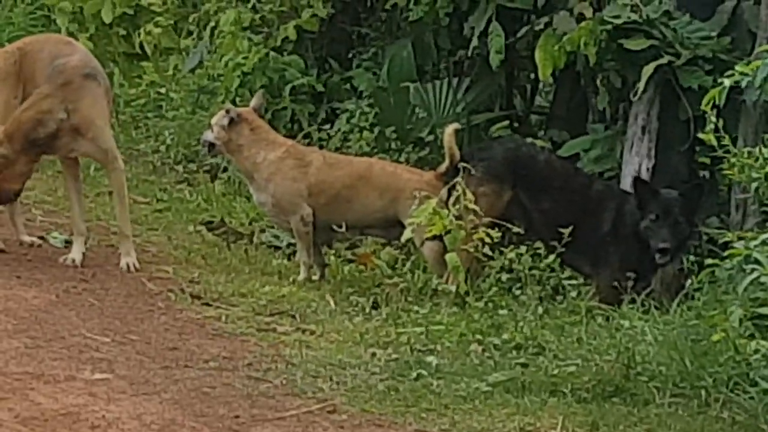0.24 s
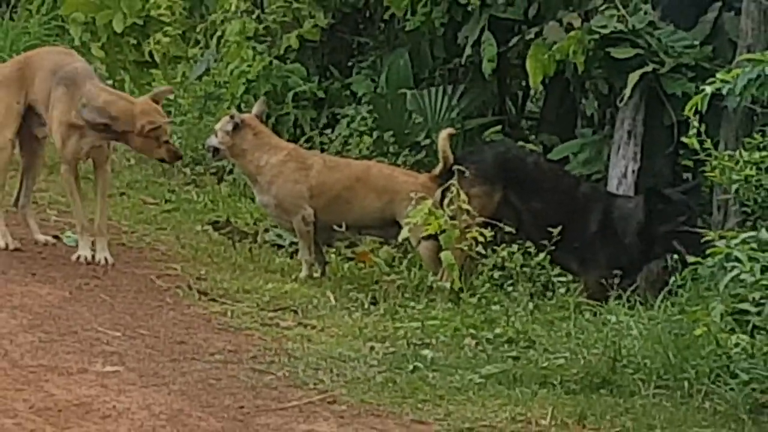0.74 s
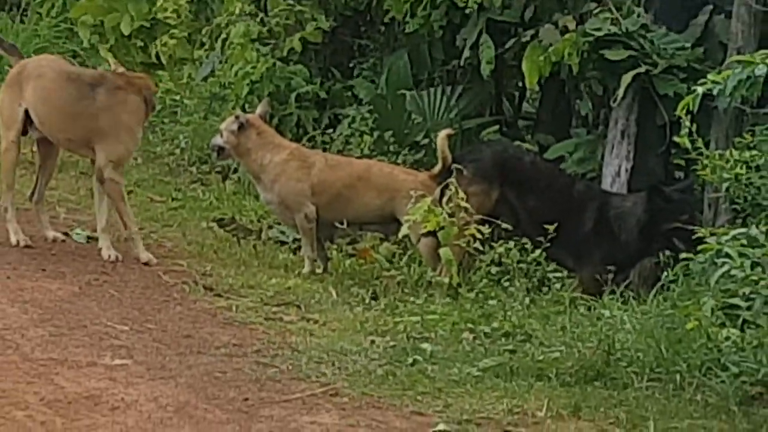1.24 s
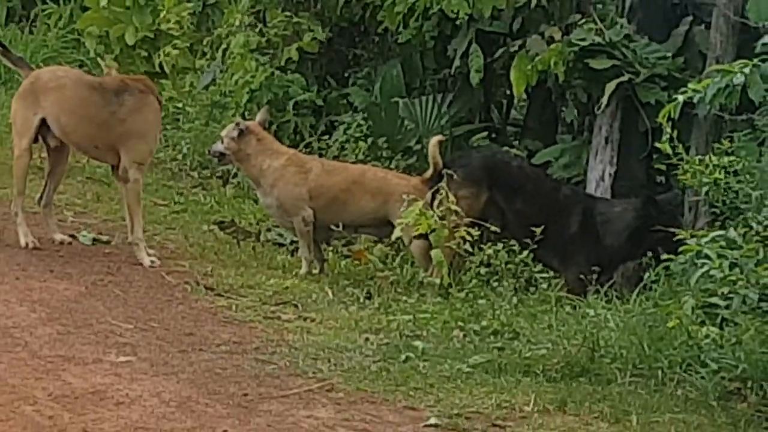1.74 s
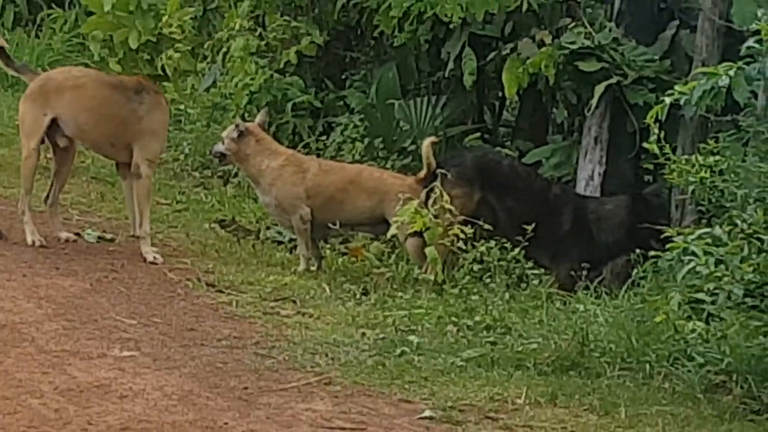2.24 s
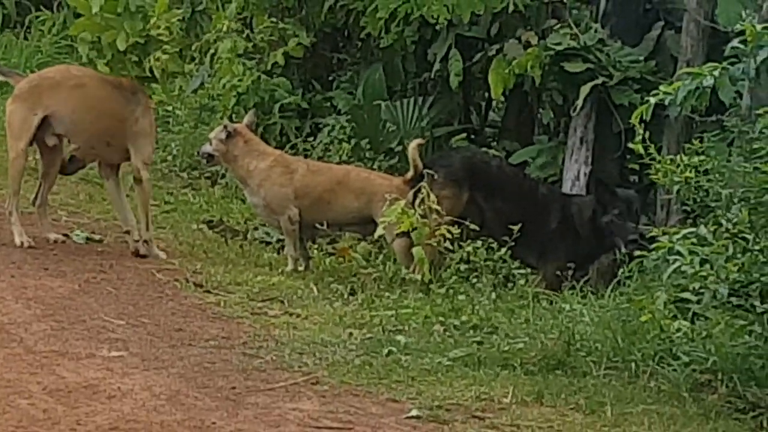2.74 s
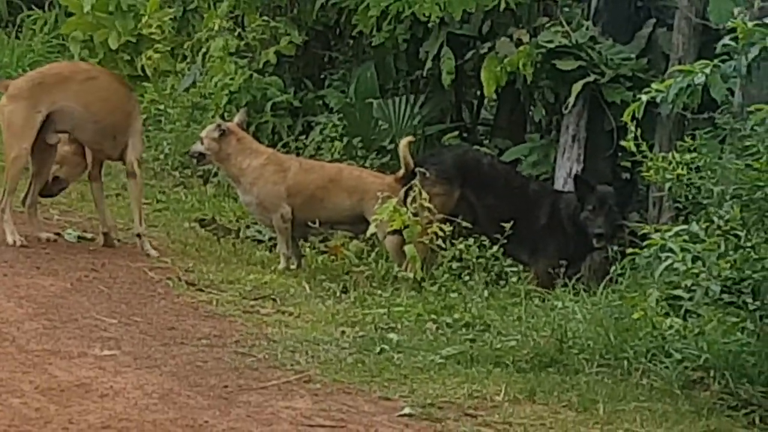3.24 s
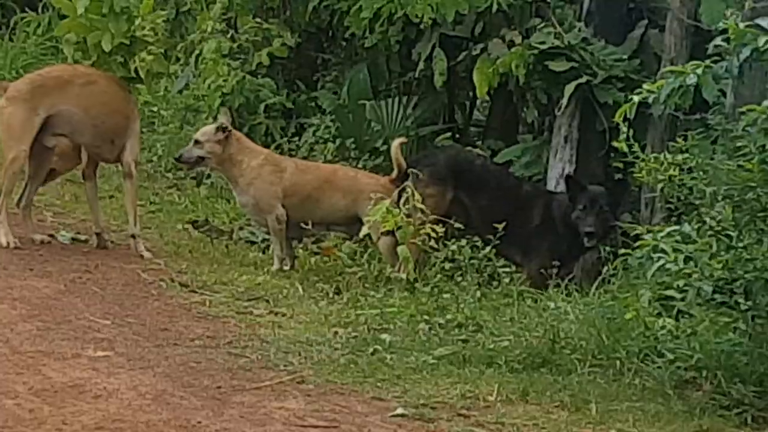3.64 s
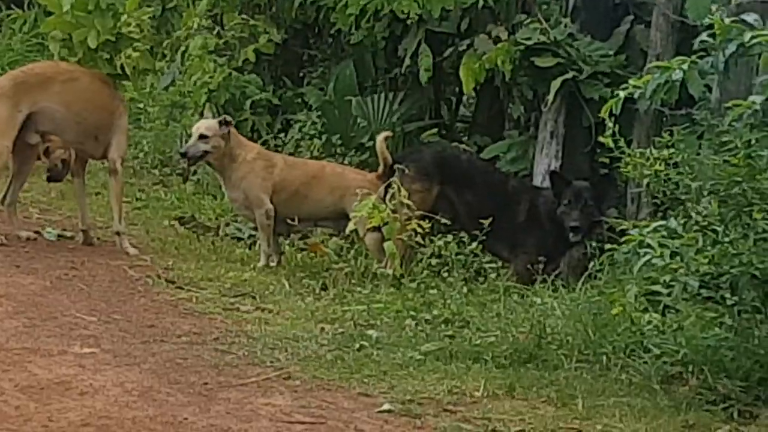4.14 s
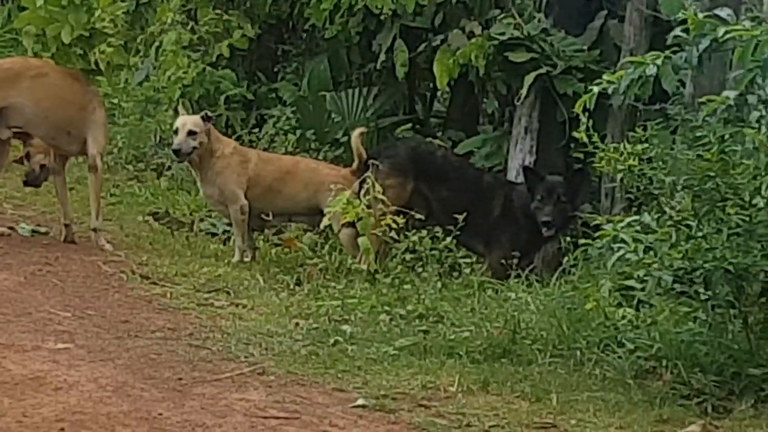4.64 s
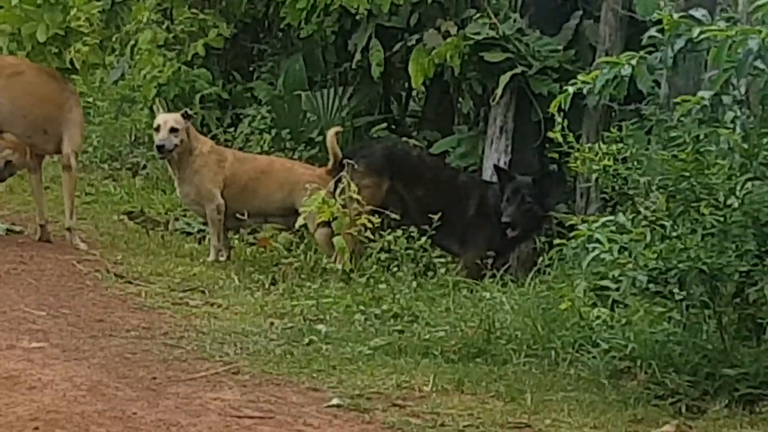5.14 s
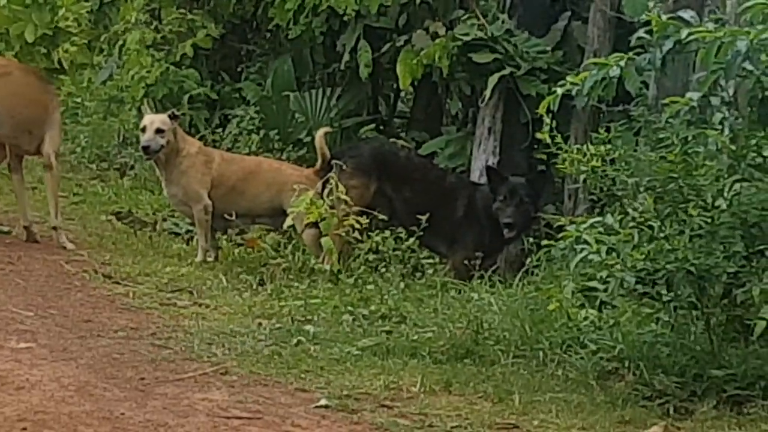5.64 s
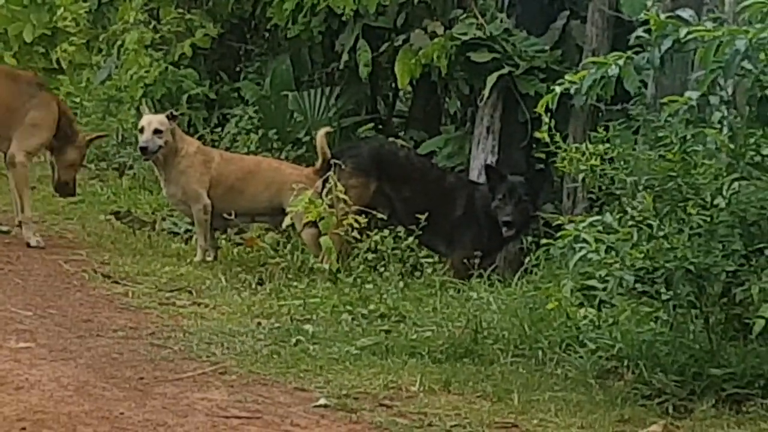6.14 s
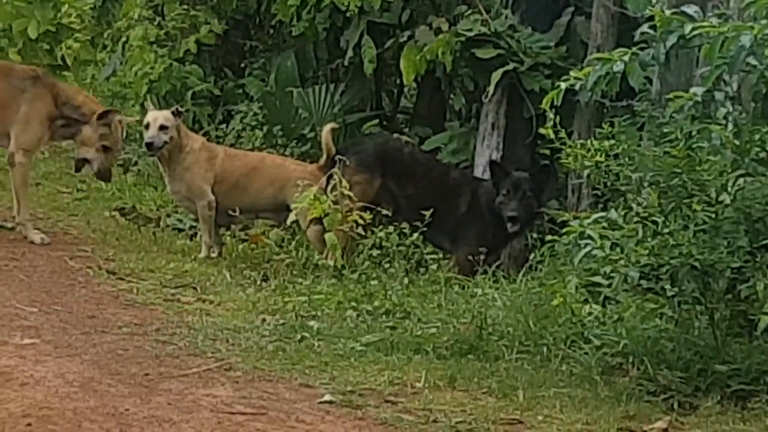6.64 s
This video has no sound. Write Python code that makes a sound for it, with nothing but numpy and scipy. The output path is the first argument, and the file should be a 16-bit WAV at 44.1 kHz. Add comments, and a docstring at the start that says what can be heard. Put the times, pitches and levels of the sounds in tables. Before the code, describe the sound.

A distant motorbike putters, grows much louder and passes close, rasping and throbbing, as one bird repeats a thin, high chip.

```python
"""At first a small one-cylinder engine, likely a motorbike, putters far down a dirt road, each firing
thumping through the muffler. A bird repeats one thin chip all along, over a soft countryside wash.
Near 3 s a breeze rises. At about 3.6 s the bike passes: gas rasps and hisses from the pipe, chain
and tyres clatter and a panel rings. The exhaust booms loudest near 5 s, then throbs as the bike
carries on, and one last gust blows by."""
import sys
import numpy as np
from scipy import signal
from scipy.fft import rfft, irfft
from scipy.io import wavfile
from scipy.ndimage import uniform_filter1d, map_coordinates

SR = 44100
rng = np.random.default_rng(int(sys.argv[2]) if len(sys.argv) > 2 else 0)


def waveform_to_disk(signal):
    """Save audio, clipped to [-1, 1], as 16-bit WAV at the path in sys.argv[1]."""
    frames = np.transpose(np.atleast_2d(signal))
    scaled = np.clip(frames, -1, 1) * 32767
    samples = np.round(scaled).astype(np.int16)
    wavfile.write(sys.argv[1], SR, samples)


N = 303827
T = np.arange(N) / SR
HZ = np.fft.rfftfreq(N, 1 / SR)
CLOSEST_S = 3.6  # when the bike is nearest


# How often the engine fires: t/s, f/Hz
FIRING_RATE = [(0.0, 37.08), (0.6, 36.57), (0.95, 37.04), (1.2, 36.4), (1.5, 36.98), (1.9, 36.24),
               (2.4, 37.16), (2.85, 36.23), (3.15, 36.72), (3.5, 36.11), (4.0, 36.0), (4.5, 36.0),
               (4.9, 36.06), (5.4, 35.89), (5.9, 35.67), (6.3, 35.48), (6.89, 35.5)]
def firings(first_firing_cycles=.27, jitter_cycles=.004, uneven_db=.5):
    """Fuel fires once a cycle, a bit unevenly. Gives a click per firing and the time since the last."""
    rate, = curves(FIRING_RATE)
    cycles = np.cumsum(rate) / SR - first_firing_cycles + jitter_cycles * drift(12)
    count = np.floor(cycles)
    pulses = np.diff(count, prepend=count[0]) * gain_of(uneven_db * drift(12))
    return pulses, cycles % 1 / rate


# The muffler's tone when far, alongside and past: f/multiples of firing_hz, relative level/dB
TONE_FAR = [(1, -29.5), (2, -17.5), (3, -14), (4, -4), (5, 2), (6, 0.5), (7, -26), (8, -8.5), (9, -1),
            (10, 7), (11, 2), (12, -25), (13, -31), (14, -23)]
TONE_ALONGSIDE = [(1, -35.5), (2, -23.5), (3, -18.5), (4, -11.5), (5, -0.5), (6, -2.5), (7, -12), (8, -6),
                  (9, -4.5), (10, -7.5), (11, -13.5), (12, -23.5), (13, -26.5), (14, -28.5)]
TONE_PAST = [(1, -39.5), (2, -27), (3, -17), (4, -7.5), (5, 4.5), (6, -3), (7, -13), (8, -10), (9, -8.5),
             (10, -14), (11, -24.5), (12, -40), (13, -35.5), (14, -34)]
# The pipe turns from far to alongside, then to past: start t/s, length/s
PIPE_TURNS = [(2.15, .65), (3.72, .45)]
def muffler(pulses, firing_hz=36.06):
    """Each firing rings the muffler, whose tone changes as we hear the pipe from a new side."""
    view = sum(ramp(start, length) for start, length in PIPE_TURNS)  # 0 far, 1 alongside, 2 past
    sound = np.zeros(N)
    for k, tone in enumerate([TONE_FAR, TONE_ALONGSIDE, TONE_PAST]):
        overtones = [(multiple * firing_hz, db) for multiple, db in tone]
        colour = [(4.2, -61)] + overtones + [(620, -46), (1200, -58), (3000, -88.5)]
        share = np.clip(1 - abs(view - k), 0, 1)
        sound -= share * ring(pulses, colour)
    return sound


# Loudness of the exhaust's three low ranges, before trims: t/s, level/dB of thud, of boom, of bark
EXHAUST_LEVELS = [(0.0, -62, -40, -48), (0.64, -50, -49.5, -45.5), (0.78, -59.5, -43.0, -50.5),
                  (1.14, -52.0, -48.5, -41), (1.45, -46, -41.5, -41.5), (1.72, -46, -48.5, -41),
                  (1.91, -62, -39.5, -43.5), (2.26, -47.5, -42.5, -45), (2.38, -50, -37.0, -35),
                  (2.6, -50, -37.5, -37.5), (2.79, -37.5, -28.5, -31.5), (3.12, -34.5, -27, -41.5),
                  (3.241, -42.5, -29, -32), (3.68, -39, -23.5, -25.5), (3.8, -34, -36, -36.5),
                  (4.069, -31.5, -24, -30.5), (5.15, -29, -18, -30), (5.529, -30, -22, -31),
                  (5.96, -32.5, -22, -29.0), (6.08, -36, -28.5, -37.5), (6.64, -41.0, -26.5, -43),
                  (6.89, -30.5, -40, -50)]
# Throb of thud, boom and bark as sound and echo beat: depth/dB, f/Hz, crest t/s
THROBS = [(3.6, 1.15, 5.45), (2.7, 4.45, 5.92), (2.0, 2.8, 5.75)]
# Tree echo against the direct sound, strong when the bike is far or hidden: t/s, level/dB
ECHO_LEVEL = [(2.2, 0), (2.42, -8), (2.95, -13), (3.16, -3), (3.35, -15), (3.72, -15), (3.82, -1),
              (4.2, -12), (5.9, -11), (6.2, -2)]
def exhaust(pulses, trims_db=(-1, -.44, -.32), flutter_db=1.1):
    """The muffler and its echoes: a thud, a boom near 180 Hz, a bark an octave up, faint overtones."""
    direct = muffler(pulses)
    echo = trunk_echoes(direct)
    echo = echo + gain_of(-9) * scatter(echo, fade_s=.51, alike=.53)
    echo_db, = curves(ECHO_LEVEL)
    spectrum = rfft(fading(direct + gain_of(echo_db) * echo))
    # split into thud, boom, bark and overtones, so each can swell on its own
    below_boom, below_bark, below_top = (1 / (1 + (HZ / hz) ** steep)
                                         for hz, steep in [(160, 20), (262, 20), (455, 60)])
    bands = [below_boom, below_bark - below_boom, below_top - below_bark, 1 - below_top]
    leaving = ramp(CLOSEST_S, 2.2)
    gains = []
    for level_db, trim_db, (depth_db, hz, crest_s) in zip(curves(EXHAUST_LEVELS), trims_db, THROBS):
        throb_db = depth_db * leaving * np.cos(2 * np.pi * hz * (T - crest_s))
        gains.append(gain_of(level_db + trim_db + throb_db))
    gains.append(passing(-57, at_s=3.9, nearing_s=1.8, leaving_s=1) + swell(-55, at_s=3.58, width_s=.35))
    return sum(gain * gain_of(flutter_db * drift(13)) * steady(irfft(spectrum * band, N))
               for gain, band in zip(gains, bands))


# The pipe's hollow chuff and the rasping gas: f/Hz, relative level/dB
CHUFF_COLOUR = [(250, -44.5), (420, -12), (500, -0.5), (600, -8), (720, -8), (850, -22.5), (1300, -47),
                (3000, -84.5)]
RASP_COLOUR = [(450, -45), (700, -19.5), (860, 2), (980, -4), (1110, -1.5), (1230, -3.5), (1500, -3),
               (1750, -17), (2200, -29.5), (4500, -75.5)]
def gas_puffs(pulses, age, knock_db=-2, crack_db=-5):
    """Each firing knocks in the pipe and puffs out swirling gas: crisp up close, smeared far away."""
    near = bell(CLOSEST_S, .54)
    crisp = puff(age, rise_s=.0014, decay_s=.008, rest=.24)
    smeared = puff(age, rise_s=.00073, decay_s=.0051, rest=.56)
    flow = near * crisp + (1 - near) * smeared
    # from far away the knock is heard by its echoes
    knock = ring(pulses, CHUFF_COLOUR)
    far_knock = steady(scatter(trunk_echoes(knock), fade_s=.21, alike=.57))
    knock = near * knock + (1 - near) * far_knock
    chuff = noise(CHUFF_COLOUR, alike=.2) * flow + gain_of(knock_db) * knock
    crack = near * ring(pulses, RASP_COLOUR)  # the steep front of each pulse
    rasp = noise(RASP_COLOUR, alike=.66) * flow + gain_of(crack_db) * crack
    chuff_gain = (passing(-55.5, at_s=4.8, nearing_s=4.4, leaving_s=1.1)
                  + swell(-53.5, at_s=3.6, width_s=.25) + swell(-52.5, at_s=4.28, width_s=.3))
    rasp_gain = (passing(-56.5, at_s=4, nearing_s=1.1, leaving_s=2)
                 + swell(-50, at_s=3.613, width_s=.23) + swell(-55, at_s=5.234, width_s=.22))
    return chuff_gain * chuff + rasp_gain * rasp


# Whistling notes of the pipe's mouth: f/Hz, width/Hz, relative level/dB
PIPE_WHISTLES = [(2800, 990, -2.5), (3900, 380, -4.5), (5140, 340, -3), (5450, 320, -7.5), (6260, 330, -3),
                 (6430, 620, -9), (7580, 450, -5), (8600, 900, -22), (12500, 2500, -16)]
def jet(age, start_s=3.16, attack_s=.22, sag_db_per_s=5, bright_db_per_octave=4):
    """Each firing spits a beam of hiss, heard only while the pipe's mouth points our way."""
    spit = rng.standard_normal((2, N)) * puff(age, rise_s=.003, decay_s=.0035, rest=.075)
    head_on = bell(3.49, .1)  # brightest when it points straight at us
    hiss = np.zeros((2, N))
    for hz, width, db in PIPE_WHISTLES:
        whistle = signal.lfilter(*signal.iirpeak(hz, hz / width, SR), spit)
        whistle = signal.lfilter(*signal.iirpeak(hz, hz / width / 2, SR), whistle)
        bright_db = bright_db_per_octave * np.log2(hz / 4000) * head_on
        hiss += gain_of(db + 3 * drift(18) + bright_db) * evened(whistle)
    level_db = -59 - sag_db_per_s * (T - start_s - attack_s)
    gain = gain_of(level_db) * hold(start_s, attack_s, end_s=3.95, release_s=.13)
    return gain * evened(hiss) * gain_of([[1], [-1]])  # a little to the left


# Chain and tyres: f/Hz, relative level/dB
CLATTER_COLOUR = [(500, -24), (900, -9.5), (1400, 0.5), (1900, -0.5), (2500, -1.5), (3200, -6.5),
                  (3800, -8), (4400, -9.5), (5000, -12.5), (6500, -25.5), (9000, -36.5)]
def clatter(age):
    """Chain and tyres rattle fairly steadily, a little harder at each firing."""
    gain = passing(-60, at_s=4.27, nearing_s=1.9, leaving_s=1.6) + swell(-64.5, at_s=5.38, width_s=.33)
    return gain * noise(CLATTER_COLOUR, alike=.19) * puff(age, rise_s=.001, decay_s=.006, rest=1)


# The panel's one narrow note: f/Hz, relative level/dB
PANEL_COLOUR = [(1800, -60), (2300, -22), (2410, -5), (2460, 0), (2510, -6), (2620, -22), (3300, -60)]
def panel(far_db=-82, held_db=-71.5):
    """A fitful ring, likely a shaken metal panel, loudest as the bike draws level."""
    held = gain_of(held_db + 2.3 * drift(10)) * hold(start_s=3.14, attack_s=.13, end_s=6, release_s=.47)
    gain = gain_of(far_db) + held + swell(-63.5, at_s=3.44, width_s=.2)
    return gain * noise(PANEL_COLOUR, alike=.13)


# How much later the bike's sound reaches the left side: t/s, delay/samples
LEFT_DELAY = [(0, 18), (2.2, 18), (2.8, -4), (3.5, -6), (4.8, -6), (5.8, -4), (6.3, -4), (6.89, 7)]
def from_road(x):
    """Sound reaches one side a little before the other, which tells us where the bike is."""
    delay, = curves(LEFT_DELAY)
    return np.array([map_coordinates(side, [np.arange(N) - sign * delay / 2], order=3, mode="nearest")
                     for side, sign in zip(x, (1, -1))])


# Big trees that throw the sound back: along the road/m, off the road/m, relative level/dB
TRUNKS = [(14.15, 3, 0), (7, -4, -5), (2, 6, -6), (-9, 4, -7)]
def trunk_echoes(x, bike_m_per_s=2.35, listener_off_m=2, sound_m_per_s=343):
    """Echoes off the trunks; their delay slides as the bike rolls, so the overtones beat."""
    bike_m = bike_m_per_s * (T - CLOSEST_S)
    direct_m = np.hypot(bike_m, listener_off_m)
    thrown = irfft(rfft(x) * np.minimum(HZ, 400), N)  # trunks return short waves best
    echoes = np.zeros(N)
    for along, off, db in TRUNKS:
        detour_m = np.hypot(bike_m - along, off) + np.hypot(along, off - listener_off_m) - direct_m
        echoes += gain_of(db) * np.interp(abs(T - detour_m / sound_m_per_s), T, thrown)
    return evened(echoes) * x.std()


def scatter(x, fade_s, alike):
    """Trunks and leaves scatter many tiny echoes, which die away by 60 dB in fade_s."""
    t = np.arange(SR // 2) / SR
    taps = rng.standard_normal((3, len(t))) * (rng.random((3, len(t))) < .05)
    taps *= (t > .006) * gain_of(-60 * t / fade_s)
    tail = np.sqrt(alike) * taps[0] + np.sqrt(1 - alike) * taps[1:]
    return signal.fftconvolve(x[None], tail / np.linalg.norm(tail[0]), axes=1)[:, :N]


def fading(x, depth_db=3.2, step_hz=48):
    """Paths through the bushes keep shifting, so each upper overtone fades in and out on its own."""
    spectrum = rfft(x)
    for hz in np.arange(230, 500, step_hz):
        band = irfft(spectrum * np.clip(1 - abs(HZ - hz) / step_hz, 0, 1), N)
        x = x + band * (gain_of(depth_db * drift(3)) - 1)
    return x


# The bird's chips: t/s, relative level/dB, top of the arch f/Hz
CHIPS = [(-.03, -50, 7400), (0.672, -54, 7130), (1.482, -53.5, 7100), (2.253, -54.5, 7040),
         (3.055, -51.5, 6980), (3.885, -53, 7030), (4.574, -53, 6900), (5.319, -52.5, 7010),
         (6.05, -55.5, 6950)]
def bird(length_s=.04, direct_db=-5, echo_db=-3):
    """Each chip arches up and down in pitch with a fast rasp; the leaves smear it."""
    song = np.zeros(N)
    rasp_hz = 135 * drift(350)
    for start_s, db, top_hz in CHIPS:
        progress = np.clip((T - start_s) / length_s, 0, 1)
        hz = top_hz - 640 * (2 * progress - .9) ** 2 + rasp_hz
        gain = gain_of(db) * np.sin(np.pi * np.sqrt(progress))
        song += gain * np.sin(2 * np.pi * np.cumsum(hz) / SR)
    return gain_of(direct_db) * song + gain_of(echo_db) * scatter(song, fade_s=.34, alike=.1)


# Rustles in the grass: t/s, level/dB, decay/s
RUSTLES = [(1.363, -58, 0.026), (5.217, -64, .006)]
def grass():
    """Dry grass is brushed for a moment."""
    gain = sum(gain_of(db) * (T > s) * np.exp(-abs(T - s) / decay) for s, db, decay in RUSTLES)
    return gain * noise([(500, -19), (2000, 3), (7000, -3), (15000, -12)], alike=.4)


# Low flutter of moving air: f/Hz, relative level/dB
BREEZE_COLOUR = [(12, -16.5), (25, -11.5), (40, -9), (52, 0), (70, -5), (100, -2.5), (300, -39.5),
                 (600, -68)]
def breeze(calm_db=-68, breeze_db=-53, lumpy_db=2):
    """Air softly buffets the microphone: calm, then a lumpy breeze with one late gust."""
    gust = swell(-50, at_s=6.7, width_s=.097)
    gain = gain_of(calm_db) + gain_of(breeze_db) * ramp(2.65, .37) + gust
    return gain * gain_of(lumpy_db * drift(4.8)) * noise(BREEZE_COLOUR, alike=.6)


# The countryside's soft wash: f/Hz, relative level/dB
WASH_COLOUR = [(30, -33.5), (60, -13.5), (110, -8), (190, -12), (360, -3.5), (455, -15), (815, -19.5),
               (1500, -26), (2120, -27), (3600, -36), (6000, -40), (8200, -43.5), (9500, -48.5),
               (15700, -53)]
# How alike the wash is on the left and right: f/Hz, relative likeness
WASH_LIKENESS = [(60, 0.92), (150, 1), (380, 0.77), (950, 0.03), (2380, -0.14), (5980, -0.16),
                 (15000, 0.13)]
def countryside(leaves_db=-59.5, swell_db=2):
    """Leaves and faraway sounds blend and gently swell; the leaves' range sets the loudness."""
    air = noise(WASH_COLOUR, alike=1.2 * at_pitches(WASH_LIKENESS, HZ))
    leaves = signal.sosfilt(signal.butter(4, [700, 6000], "band", fs=SR, output="sos"), air.mean(0))
    return gain_of(leaves_db + swell_db * drift(3.2)) * air / leaves.std()


def gain_of(db):
    """Turns decibels into a number to multiply by."""
    return 10 ** (np.asarray(db) / 20)


def evened(x):
    """Scales a signal to an average (rms) size of 1."""
    return x / np.sqrt(np.mean(x ** 2) + 1e-20)


def steady(x, size=3675):
    """Holds the level at 1 over about three firings."""
    power = uniform_filter1d(uniform_filter1d(np.mean(x ** 2, 0), size), size // 3)
    return x / np.sqrt(abs(power) + 1e-6 * power.mean())


def curves(rows):
    """Each column of a table, joined by straight lines in time."""
    times, *columns = np.transpose(rows)
    return [np.interp(T, times, column) for column in columns]


def at_pitches(rows, hz):
    """Looks up a table at the frequencies hz, spaced like musical pitch."""
    f, value = np.transpose(rows)
    return np.interp(np.log(hz + 1), np.log(f + 1), value)


def drift(per_s):
    """A smooth random wobble of size 1, with up to about per_s swings a second."""
    return evened(irfft(rfft(rng.standard_normal(N)) / (1 + (HZ / per_s) ** 4), N))


def noise(colour, alike):
    """Stereo noise; colour is its level at each pitch, and alike=1 makes both sides the same."""
    a, b = rfft(rng.standard_normal((2, N)))
    alike = np.clip(alike, -1, 1)
    mid, side = np.sqrt(1 + alike) * a, np.sqrt(1 - alike) * b
    return evened(irfft(np.array([mid + side, mid - side]) * gain_of(at_pitches(colour, HZ)), N))


def ring(pulses, colour, size=8192):
    """Each click sets off a short ring with the given colour."""
    log_gain = np.log(gain_of(at_pitches(colour, abs(np.fft.fftfreq(size, 1 / SR)))))
    spectrum = np.exp(np.conj(signal.hilbert(log_gain)))  # rings only after the click
    one_ring = np.fft.ifft(spectrum).real[:size // 2]
    return evened(signal.oaconvolve(pulses, one_ring)[:N])


def puff(age, rise_s, decay_s, rest):
    """One engine cycle: a quick burst on top of a steady rest; age is the time since the firing."""
    return evened(rest + (1 - np.exp(-age / rise_s)) * np.exp(-age / decay_s))


def ramp(start_s, length_s):
    """Rises from 0 to 1 and stays there."""
    return np.clip((T - start_s) / length_s, 0, 1)


def hold(start_s, attack_s, end_s, release_s):
    """Rises to 1, stays until end_s, then dies away."""
    return ramp(start_s, attack_s) * np.exp(-np.maximum(T - end_s, 0) / release_s)


def bell(at_s, width_s):
    """Rises smoothly to 1 and falls again."""
    return np.exp(-((T - at_s) / width_s) ** 2)


def swell(db, at_s, width_s):
    """A brief rise and fall that peaks at db."""
    return gain_of(db) * bell(at_s, width_s)


def passing(db, at_s, nearing_s, leaving_s):
    """Quieter with distance: 3 dB down nearing_s before and leaving_s after the peak."""
    return gain_of(db) / np.hypot(1, (T - at_s) / np.where(T < at_s, nearing_s, leaving_s))


def scene():
    """The bike on the road, the bird and the surroundings."""
    pulses, age = firings()
    bike = from_road(exhaust(pulses) + gas_puffs(pulses, age) + clatter(age)) + jet(age) + panel()
    return bike + bird() + grass() + countryside() + breeze()


# The microphone's own hiss: f/Hz, relative level/dB
HISS_COLOUR = [(100, -12), (9500, -3), (12000, 3), (15700, -2.5)]
def record(dry, hiss_db=-73, top_hz=15800):
    """Adds the microphone's faint hiss and cuts the very highest treble."""
    wet = dry + gain_of(hiss_db) * noise(HISS_COLOUR, alike=0)
    treble_cut = signal.firwin(511, top_hz, window=("kaiser", 9), fs=SR)
    return signal.oaconvolve(wet, treble_cut[None], "same")


dry = scene()
out = record(dry)
waveform_to_disk(out)
```